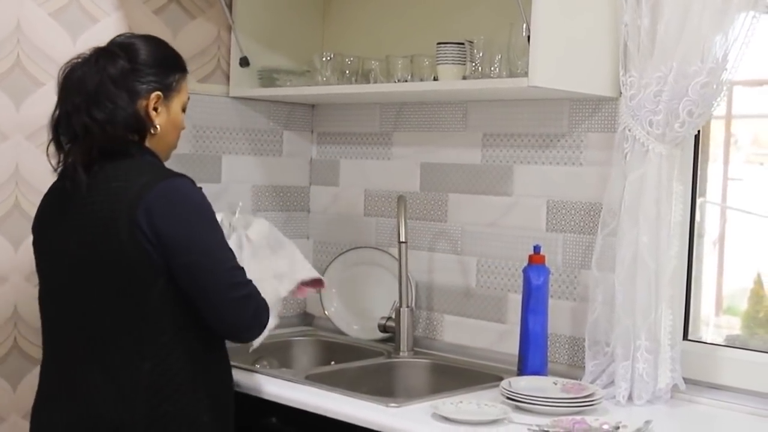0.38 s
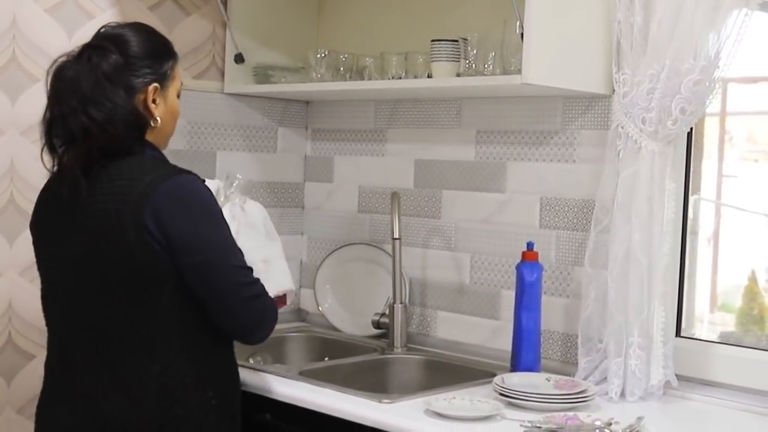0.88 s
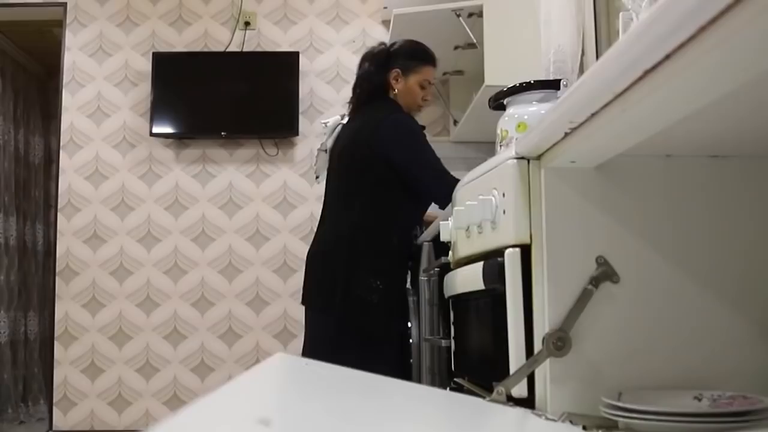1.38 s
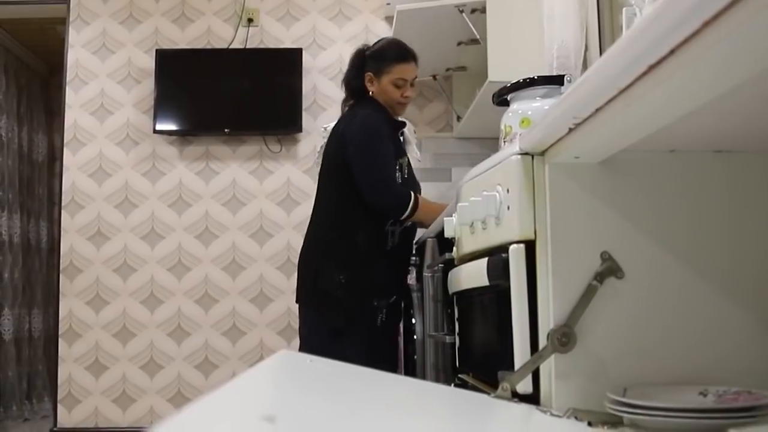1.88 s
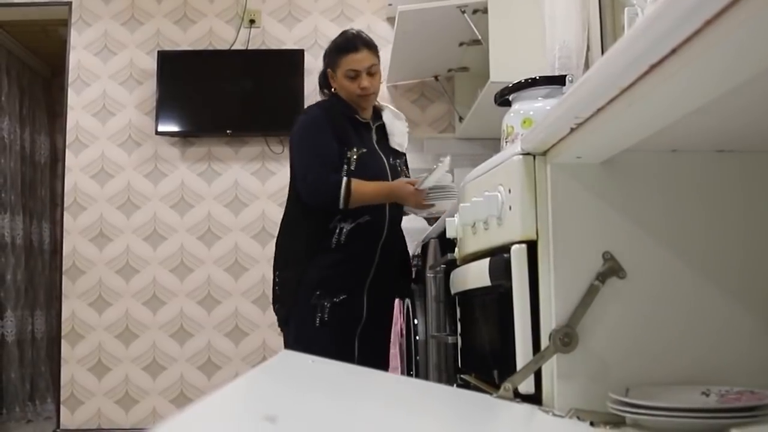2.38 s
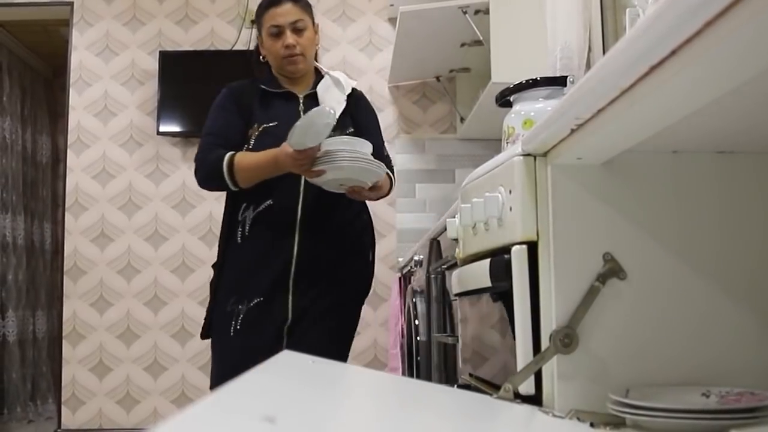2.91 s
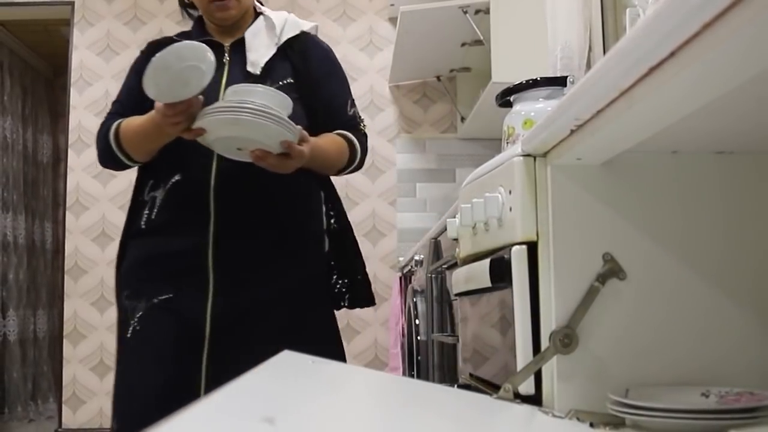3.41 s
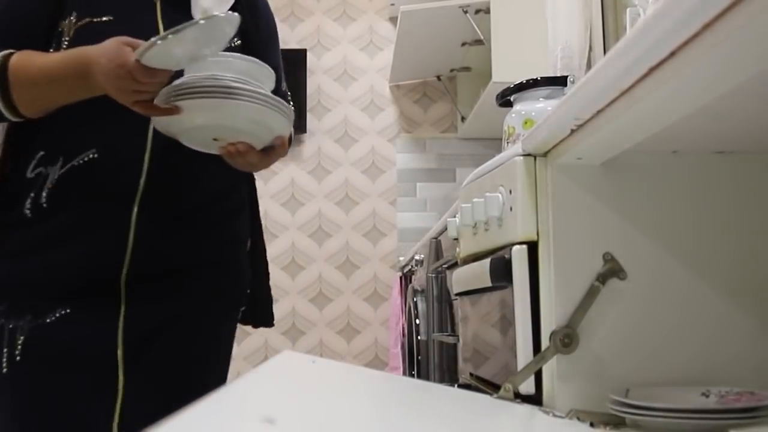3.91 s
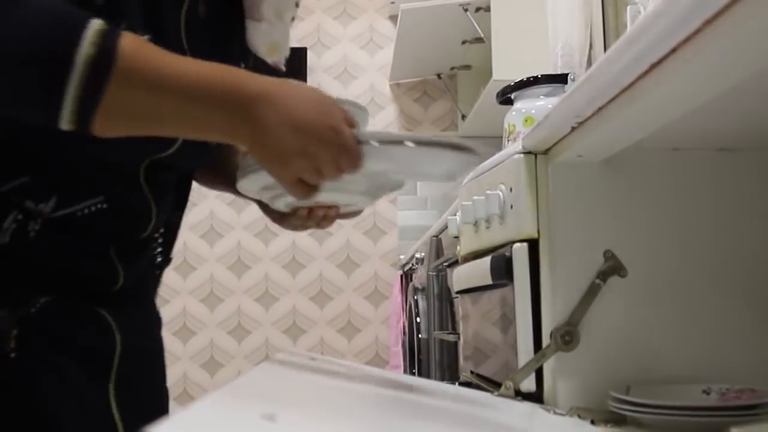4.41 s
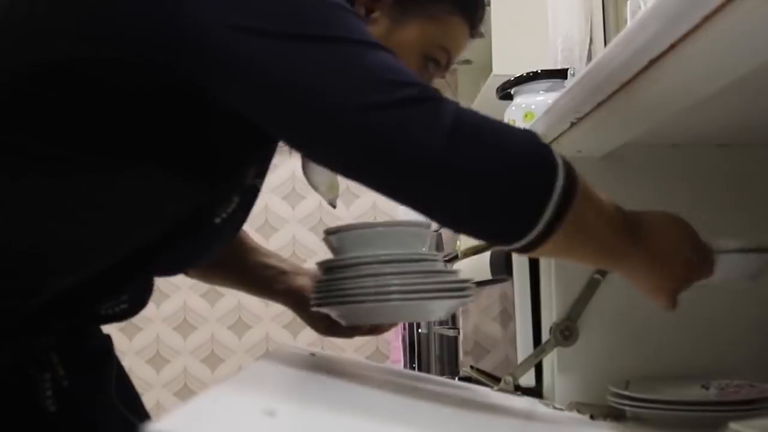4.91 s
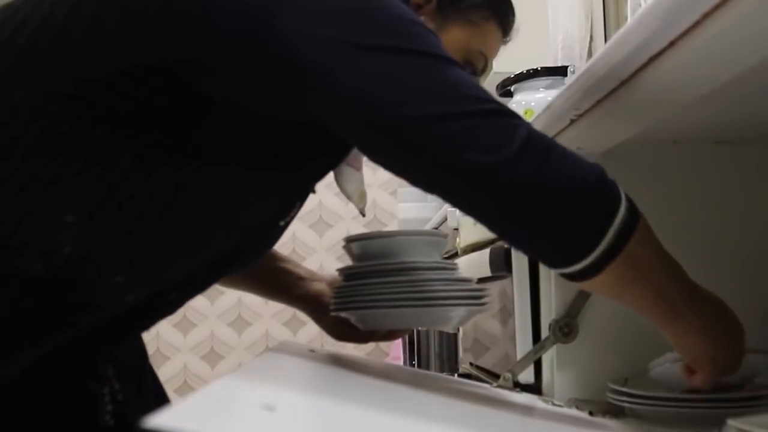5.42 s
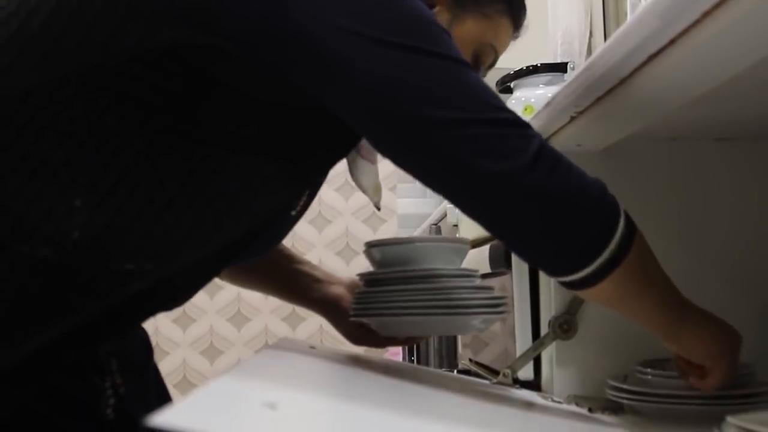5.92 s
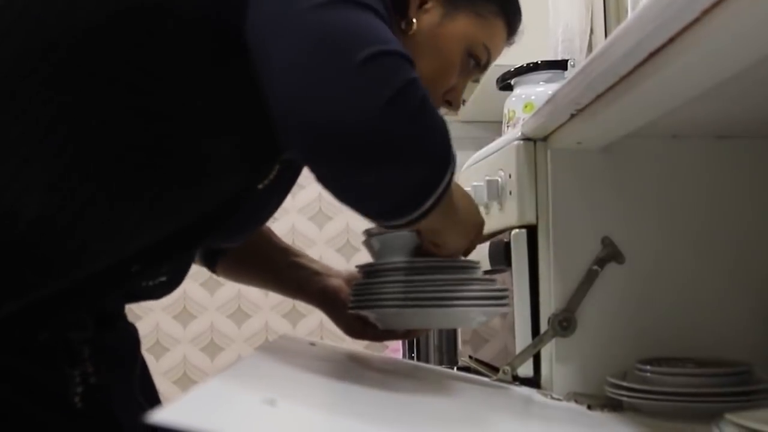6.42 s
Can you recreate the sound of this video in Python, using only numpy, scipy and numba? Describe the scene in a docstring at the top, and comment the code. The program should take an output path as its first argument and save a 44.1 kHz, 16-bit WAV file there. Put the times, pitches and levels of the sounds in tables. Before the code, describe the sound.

In a tiled, reverberant kitchen with low rumble and faint cloth hiss, a dish knocks at a distant sink, followed by a soft towel brush. Plates clack in a rack, then a carried stack clinks and ticks lightly. A saucer knocks sharply; a very hard, overloaded plate blow lands close to the microphone, followed by a dense ceramic clatter and cabinet thuds.

```python
"""A tiled kitchen with a low rumble, a steady tone and a faint cloth hiss that swells at each brush.
Glazed plates are knocked far off at the sink, then in a rack, then in a stack carried across the room with
faint touches, a cup, a footstep and a saucer; last, close to the microphone, a hard blow and a pile on a shelf.
Each contact is a chatter of tiny impacts that rings the thing's modes, heard directly and through the live room.
The camera's gain control ducks after loud blows, flattening the tails, and the hardest blow overloads it."""
import sys
import numpy as np
from scipy import signal
from scipy.fft import rfft, irfft
from scipy.io import wavfile
from scipy.ndimage import uniform_filter1d
from numba import njit

SR = 44100
rng = np.random.default_rng(int(sys.argv[2]) if len(sys.argv) > 2 else 0)


def wav_record(signal):
    """Record a signal, one row per channel, as 16-bit PCM in the file named by sys.argv[1]."""
    frames = np.transpose(np.atleast_2d(signal))
    bounded = np.clip(frames, -1, 1)
    # unit amplitude maps onto the largest positive 16-bit level
    quanta = np.round(bounded * 32767).astype(np.int16)
    wavfile.write(sys.argv[1], SR, quanta)


def natural_amplitude(level_db):
    """Convert a level in decibels to a linear amplitude factor, elementwise."""
    exponent = np.asarray(level_db, float) / 20
    return 10 ** exponent


N = 288855  # samples


def band(x, lo_hz, hi_hz):
    """Butterworth band-pass."""
    return signal.sosfilt(signal.butter(2, [lo_hz, min(hi_hz, .45 * SR)], "bandpass", fs=SR, output="sos"), x)


def level(x, db):
    """Scales to an rms level."""
    return x * natural_amplitude(db) / np.sqrt(np.mean(x ** 2))


def walk(rate):
    """Random levels held 1 / rate s and slewed twice; spread near 1."""
    k = int(SR / rate)
    held = np.repeat(rng.standard_normal(N // k + 1), k)
    return 1.66 * uniform_filter1d(uniform_filter1d(held, k), k)[:N]


# Spectrum of the empty kitchen: f/Hz, relative level/dB per Hz
KITCHEN_TONE = [(15, -18), (25, -2), (84, -44.5), (102, -13), (123, -2), (354, -10), (476, -11.5),
                (516, -15.5), (1520, -20.5), (2050, -25.5), (2760, -19.5), (3920, -22.5), (5000, -35.5),
                (16000, -84.5)]
# Swell of the low rumble, growing stronger towards the end: t/s, level/dB of its lower part
RUMBLE_SWELL = [(0, -63), (1.4, -54), (1.7, -46.5), (3.5, -46.5), (5, -43), (6.55, -41)]


def kitchen():
    """Steady room tone of coloured noise, with a slow low rumble that swells and wavers."""
    hz, db = np.transpose(KITCHEN_TONE)
    colour = natural_amplitude(np.interp(np.log(np.fft.rfftfreq(N, 1 / SR) + 1), np.log(hz), db))
    tone = level(irfft(rfft(rng.standard_normal(N)) * colour, N), -44.5)
    lower = level(band(band(rng.standard_normal(N), 43, 117), 43, 117), 0)
    upper = level(band(rng.standard_normal(N), 180, 305), -2.5)
    swell_db = np.interp(np.arange(N) / SR, *np.transpose(RUMBLE_SWELL)) + walk(10)
    return tone + (lower + upper) * natural_amplitude(swell_db)


# Brushes of cloth: t/s of the peak, level/dB added to the steady hiss at that peak
CLOTH_BRUSHES = [(.48, -54.5), (3.12, -58), (4.02, -59), (4.15, -57), (5.12, -62)]


def cloth():
    """Towel and sleeves: a faint grainy hiss, its noise flickering in level, that swells at each brush."""
    rise_s, fall_s, steady_db = 0.047, 0.055, -62
    t = np.arange(N) / SR
    swell = natural_amplitude(steady_db)
    for s, db in CLOTH_BRUSHES:
        swell = swell + natural_amplitude(db) * np.exp(-((t - s) / np.where(t < s, rise_s, fall_s)) ** 2)
    grain = rng.standard_normal(N) * natural_amplitude(0.5 * walk(130))
    return level(band(grain, 1600, 10000), 0) * swell


@njit
def ring(push, hz, width, gain):
    """A bank of decaying modes driven by a force; a wider mode dies sooner."""
    out = np.zeros(len(push))
    for m in range(len(hz)):
        p, z = np.exp((2j * hz[m] - width[m]) * np.pi / SR), 0j
        for i in range(len(push)):
            z = z * p + push[i]
            out[i] += gain[m] * z.imag
    return out


CONTACT_HZ = 2900  # low-pass corner of the contact force
CHATTER_END = 1.51  # exponent: 1 fades evenly, higher holds and then stops
FREE_RING_HZ = 10  # modes narrower than this lie away from the contact and are not damped by it
HARDER_DB = 0.1972  # dB per octave of extra tilt for each dB above the thing's median blow
HIGHER_DB, MIDDLE_HZ = 2, 2000  # dB per octave of extra tilt for each octave of favoured pitch above MIDDLE_HZ


def with_thicket(modes, damp, dense_db):
    """Touching plates and uneven glaze fill the gaps with many short modes on the same overall slope."""
    hz, width, db = np.transpose(modes)
    thick_hz = hz.min() * (1.2 * hz.max() / hz.min()) ** ((np.arange(60) + rng.random(60)) / 60)
    thick_db = dense_db + np.interp(np.log(thick_hz), np.log(hz), uniform_filter1d(db, size=3))
    width = np.where(width < FREE_RING_HZ, np.maximum(width, 2), damp * width)
    return np.append(hz, thick_hz), np.append(width, 0.13 * thick_hz), np.append(db, thick_db)


def blows(hits, modes, damp, dense_db, favour_db, wet_db, tilt_db, spot_oct=0.11, low_soft=True):
    """Each contact is a fading chatter of tiny impacts into strong and weak modes; direct and room share."""
    out = np.zeros(N + SR)
    hz, width, db = with_thicket(modes, damp, dense_db)
    t = np.arange(int(.4 * SR)) / SR
    soft = signal.butter(2, CONTACT_HZ, fs=SR, output="sos")
    usual_db = np.median(np.transpose(hits)[1])
    for s, blow_db, favoured_hz, chatter in hits:
        force = rng.standard_normal(len(t)) * (rng.random(len(t)) < .06)  # about 2600 impacts a second
        force[int(.001 * SR)] = 1.5
        fade = np.exp(-(t / max(chatter, 1e-3)) ** CHATTER_END)
        force = signal.sosfilt(soft, force * fade * np.minimum(t / 0.0036, 1))
        # evens out the force spectrum: mode levels are as heard, whatever the chatter
        power = uniform_filter1d(np.abs(rfft(force)) ** 2, size=15)
        lift = np.interp(hz, np.fft.rfftfreq(len(t), 1 / SR), power) ** -.5
        # hard contact favours the high modes; the spot of contact favours those near one pitch
        hard_db = tilt_db + HARDER_DB * (blow_db - usual_db)
        hard_db += low_soft * HIGHER_DB * np.log2(favoured_hz / MIDDLE_HZ)
        octaves = np.log2(hz / favoured_hz)
        share_db = db + hard_db * octaves + favour_db * np.exp(-(octaves / spot_oct) ** 2)
        # each mode starts in or out, with some scatter in level
        side = rng.choice([-1, 1], len(hz)) * natural_amplitude(2 * rng.standard_normal(len(hz)))
        gain = side * natural_amplitude(share_db) * np.sqrt(width) * lift / hz
        sound = np.diff(ring(force, hz, width, gain), prepend=0)
        i = max(int(s * SR), 0)
        out[i:i + len(t)] += natural_amplitude(blow_db) * sound / (3 * sound[:int(.03 * SR)].std())
    return np.array([out[:N], natural_amplitude(wet_db) * out[:N]])


# In every pair of tables below:
# modes: f/Hz, width/Hz before damp scales it, relative level/dB before tilt and favoured spot
# hits: t/s, level/dB at three times the early rms, favoured f/Hz, chatter t/s

# Modes of the dish at the sink, with a clear low ring: f/Hz, width/Hz, level/dB
SINK_MODES = [(354.6, 85, -20.5), (614, 5, 5), (740, 150, 2.5), (1270, 83, -3), (2282, 68, -6.5),
              (3136, 82, 7), (3740, 87, 1.5), (3870, 360, -1.5), (4450, 71, 1.5), (5920, 36, -2),
              (7270, 110, -22), (8100, 57, -15), (9650, 80, -13), (10700, 53, -23), (12500, 99, -24),
              (14300, 74, -29)]
# Its contacts: t/s, level/dB, favoured f/Hz, chatter t/s
SINK_CONTACTS = [(0.0, -10.5, 3240, 0.0098), (.058, -10.5, 4700, 0.019), (.066, -9, 614, 0.02),
                 (.095, -10, 3870, 0.08), (.15, -12, 3070, 0.012), (.225, -26, 3000, 0.0075)]


def sink():
    """A dish knocked at the sink, far from the microphone: damped modes with a large room share."""
    return blows(SINK_CONTACTS, SINK_MODES, damp=2.9, dense_db=-0.83, favour_db=5.3, wet_db=1.0, tilt_db=1.6)


# Tail of the tiled room: f/Hz, t60/s, relative level/dB
ROOM_TAIL = [(119.5, 0.58, 15), (485, 0.69, -0.5), (1500, 0.54, 2.5), (3290, 0.51, 3), (7060, 0.43, -1.5),
             (13000, 0.27, 3)]


def room(x):
    """Tiled walls: a dense tail that builds in a few ms and dies sooner in the treble."""
    t = np.arange(SR) / SR
    hz, t60, db = np.transpose(ROOM_TAIL)
    tail = 0
    for f in 90 * 2 ** np.arange(0, 8, .5):
        fade = np.exp(-np.log(1000) * t / np.interp(np.log(f), np.log(hz), t60))
        noise = band(rng.standard_normal(SR), f / 2 ** 0.29, f * 2 ** 0.24)
        tail = tail + natural_amplitude(np.interp(np.log(f), np.log(hz), db)) * fade * noise
    tail *= 1 - np.exp(-t / 0.0086)
    return signal.fftconvolve(x, natural_amplitude(0.5) * tail / np.sqrt(np.sum(tail ** 2)))[:N]


# Modes of the plate in the rack: f/Hz, width/Hz, level/dB
RACK_MODES = [(417, 64, 21), (824, 110, 1.5), (1290, 200, 12.5), (1670, 130, -10.5), (2125, 38, 2),
              (2670, 36, 9), (3030, 9.3, -5), (3270, 68, 7), (3530, 49, 10), (4070, 20, -14.5),
              (5220, 52, -11.5), (5800, 240, -5), (7750, 27, -26), (9840, 71, -22.5), (11100, 30, -26.5),
              (13670, 80, -39.5)]
# Its contacts: t/s, level/dB, favoured f/Hz, chatter t/s
RACK_CONTACTS = [(1.472, -6.5, 2780, 0.07), (1.502, -20.5, 3550, 0.0085), (1.513, -3, 3300, 0.006),
                 (1.531, -11, 3300, 0.034)]


def rack():
    """A plate knocked in the rack: damped modes, tilted strongly to the treble."""
    return blows(RACK_CONTACTS, RACK_MODES, damp=2.6, dense_db=-5, favour_db=5.8, wet_db=0.96, tilt_db=6.4)


# Modes of the carried stack: f/Hz, width/Hz, level/dB
STACK_MODES = [(454.2, 120, -1.5), (700, 37, 1), (1084, 420, 5), (1247, 310, 6.5), (1312, 20, -2),
               (1921, 29, 5.5), (2160, 80, 1.5), (2480, 20, 1), (2950, 154, 7), (3300, 220, 3.5),
               (4080, 25, -26), (4250, 16, -3), (4800, 60, -45), (5750, 50, -15), (5830, 51, -14.5),
               (6900, 59, -41), (8400, 52, -24.5), (9250, 60, -31.5)]
# Its contacts: t/s, level/dB, favoured f/Hz, chatter t/s
STACK_CONTACTS = [(1.739, -19.5, 950, 0.016), (2.015, -37, 1280, 0.017), (2.04, -32, 1430, 0.092),
                  (2.147, -9, 1900, 0.076), (2.22, -11, 2340, 0.014), (2.457, -31, 1890, 0.017),
                  (2.473, -19, 1030, 0.0096), (2.56, -16.5, 2160, 0.011), (2.6, -14.5, 2700, 0.012),
                  (2.937, -26.5, 1780, 0.012), (3.07, -31.5, 1000, 0.013), (3.158, -26.5, 1000, 0.011),
                  (3.215, -20, 935, 0.011), (3.236, -13.5, 1004, 0.027), (3.476, -22, 1900, 0.012),
                  (3.488, -21, 4440, 0.0043), (3.611, -18, 4270, 0.019), (3.75, -16.5, 700, 0.0095),
                  (3.785, -23, 1900, 0.0062), (3.902, -23.5, 2110, 0.0098), (3.999, -27, 1900, 0.018),
                  (4.091, -26, 1160, 0.019), (4.164, -26.5, 1900, 0.01), (4.278, -21.5, 2460, 0.0096),
                  (4.387, -19.5, 2480, 0.0082), (4.512, -17.5, 1140, 0.031), (4.62, -33.5, 2110, 0.016),
                  (4.65, -25, 1270, 0.02), (4.96, -24.5, 800, 0.015), (5.071, -26.5, 1300, 0.011)]


def stack():
    """Plates carried across the room: knocks and faint touches into modes damped by their neighbours."""
    hits = np.vstack([STACK_CONTACTS, rattle(count=14)])
    return blows(hits, STACK_MODES, damp=2.7, dense_db=-3.5, favour_db=5.5, wet_db=-0.79, tilt_db=-.3)


def rattle(count):
    """The carried stack touches itself faintly at random moments and spots."""
    start_s, end_s, middle_db, spread_db = 1.9, 5.45, -39, 4
    when, size, spot = rng.random((count, 3)).T
    s = start_s + (end_s - start_s) * (np.arange(count) + when) / count
    touch_db = middle_db + spread_db * (2 * size - 1)
    return np.transpose([s, touch_db, 900 * 3.3 ** spot, np.full(count, .01)])


# Modes of the cup: f/Hz, width/Hz, level/dB
CUP_MODES = [(5500, 25, 10), (5750, 21, 5), (5980, 15, -23), (7100, 15, 2), (8250, 13, 10), (13260, 40, 0)]
# Its contacts: t/s, level/dB, favoured f/Hz, chatter t/s
CUP_CONTACTS = [(2.95, -51, 8250, 0.003), (3.028, -36, 5500, 0.0053), (4.353, -43, 5750, .004),
                (4.402, -39, 5750, 0.0062), (5.87, -26, 8250, 0.022)]


def cup():
    """Faint high cup touches: narrow modes, each contact favouring one pitch sharply."""
    return blows(CUP_CONTACTS, CUP_MODES, damp=1.6, dense_db=-10, favour_db=16, wet_db=-0.5, tilt_db=.01,
                 spot_oct=.04)


# Low modes shared by the footstep and the cabinet: f/Hz, width/Hz, level/dB
THUD_MODES = [(68.1, 38, -22), (100, 18, -5), (146, 31, -15), (208.4, 31, 3), (270, 37, -4.5),
              (392, 130, 8.5), (475, 4.1, 0), (674, 40, -15)]
# A footstep at 3.81 s, then knocks of the cabinet: t/s, level/dB, favoured f/Hz, chatter t/s
THUD_CONTACTS = [(3.81, -27.5, 100, 0.063), (5.547, -3, 237, 0.0057), (5.79, -8.5, 475, 0.006),
                 (5.93, -12.5, 270, 0.051), (6.01, -10.5, 475, 0.058), (6.13, -22, 159, 0.016)]


def footstep_and_cabinet():
    """Low thuds, a footstep and then cabinet knocks: few deep modes, no extra tilt for the favoured pitch."""
    return blows(THUD_CONTACTS, THUD_MODES, damp=0.73, dense_db=-5, favour_db=17.7, wet_db=-1.5,
                 tilt_db=.4, low_soft=False)


# Modes of the saucer: f/Hz, width/Hz, level/dB
SAUCER_MODES = [(1176, 42, 1), (1300, 57, 10), (1790, 40, -7), (2610, 25, 12), (3570, 100, -7),
                (3865, 310, 5.5), (5400, 40, -7), (4800, 32, -27), (6370, 63, -3.5), (7440, 40, -13.5),
                (8850, 46, -24), (10300, 63, -20), (10960, 80, -22)]
# Its contact: t/s, level/dB, favoured f/Hz, chatter t/s
SAUCER_CONTACTS = [(4.724, -3.5, 3710, 0.0026)]


def saucer():
    """One short knock on a saucer: strongly damped modes over a weak thicket."""
    return blows(SAUCER_CONTACTS, SAUCER_MODES, damp=3.0, dense_db=-12, favour_db=6.5, wet_db=-1.65, tilt_db=1.0)


# Modes of the plate on the shelf, with one clear ring: f/Hz, width/Hz, level/dB
SHELF_MODES = [(313.5, 49, -27), (716, 44, -6.5), (1300, 33, -3), (1900, 60, -13.5), (2460, 26, 1),
               (2750, 30, -10), (3000, 40, -13.5), (3600, 430, 4), (3962, 7, 2), (4600, 33, -16.5),
               (5370, 30, -12), (5980, 51, -9.5), (6690, 50, -9.5), (7900, 50, -18), (11460, 60, -24)]
# Its contact, the hardest blow: t/s, level/dB, favoured f/Hz, chatter t/s
SHELF_CONTACTS = [(5.546, 20.7, 3960, 0.005)]


def shelf():
    """A plate struck hard on the shelf, close to the microphone: freer modes and a small room share."""
    return blows(SHELF_CONTACTS, SHELF_MODES, damp=0.75, dense_db=1.0, favour_db=6.5, wet_db=-3.9, tilt_db=.03)


# Modes of the pile on the shelf: f/Hz, width/Hz, level/dB
PILE_MODES = [(620, 23, -1.5), (1000, 36, -5), (1235, 210, 3), (1590, 44, -0.5), (1900, 85, 0.5),
              (2000, 74, 0), (2580, 28, -3.5), (2700, 150, 8), (3070, 29, -0.5), (3540, 61, -7.5),
              (4310, 37, -7), (5100, 580, -7.5), (6260, 45, -14.5), (7500, 69, -15.5), (8475, 130, -17.5),
              (11155, 80, -29.5)]
# Its contacts: t/s, level/dB, favoured f/Hz, chatter t/s
PILE_CONTACTS = [(5.779, 0.5, 1300, 0.066), (5.791, 3, 2950, 0.0037), (5.817, 2.5, 1590, 0.031),
                 (5.85, -2, 1590, 0.063), (5.907, -3, 700, 0.0068), (5.942, -0.5, 2060, 0.036),
                 (5.955, -1, 2640, 0.017), (5.968, -1.5, 1000, 0.035), (6.007, 3.5, 2500, 0.02),
                 (6.071, -1.5, 1800, 0.0081), (6.087, -1.5, 1220, 0.0081), (6.13, -14, 620, 0.0027),
                 (6.245, -23.5, 3000, 0.0053), (6.432, -6, 2700, 0.028), (6.485, -0.5, 3300, 0.0074),
                 (6.501, 1, 2950, 0.037)]


def pile():
    """A clatter of plates on the shelf, close to the microphone: each contact picks out its own pitch."""
    return blows(PILE_CONTACTS, PILE_MODES, damp=1.1, dense_db=-7.0, favour_db=13.9, wet_db=-9.5, tilt_db=.3)


def scene():
    """Crockery and thuds, direct and through the room, over the background; the shelf is close, the sink far."""
    direct, sent = (sink() + rack() + stack() + cup() + footstep_and_cabinet()
                    + saucer() + shelf() + pile())
    return (direct + room(sent) + kitchen() + cloth())[None]


@njit
def gain_control(x, top, slope, attack, release, lag, slew):
    """Follows the level and, a moment late and smoothly, turns down whatever passes the top."""
    out, seen, e, gain = np.empty(len(x)), np.zeros(len(x)), 0., 1.
    for i in range(len(x)):
        e += (abs(x[i]) - e) * (attack if abs(x[i]) > e else release)
        seen[i] = e
        wanted = min(1., (top / (seen[max(i - lag, 0)] + 1e-9)) ** slope)
        gain += (wanted - gain) * slew
        out[i] = x[i] * gain
    return out


def roll_off(x):
    """The treble ends steeply here."""
    return signal.sosfilt(signal.butter(12, 16330, fs=SR, output="sos"), x)


def record(dry):
    """Camera microphone: gain control lags the sharpest blows, which clip before it catches up."""
    attack_s, release_s, lag_s, slew_s = 0.016, .055, 0.0023, 0.0059
    slope = .88  # share of the excess level in dB that is taken away
    held = gain_control(dry[0], natural_amplitude(-19.5), slope, 1 / (attack_s * SR), 1 / (release_s * SR),
                        int(lag_s * SR), 1 / (slew_s * SR))
    mix = np.clip(held, -1, 1)[None]
    return roll_off(mix)


dry = scene()
out = record(dry)
wav_record(out)
```